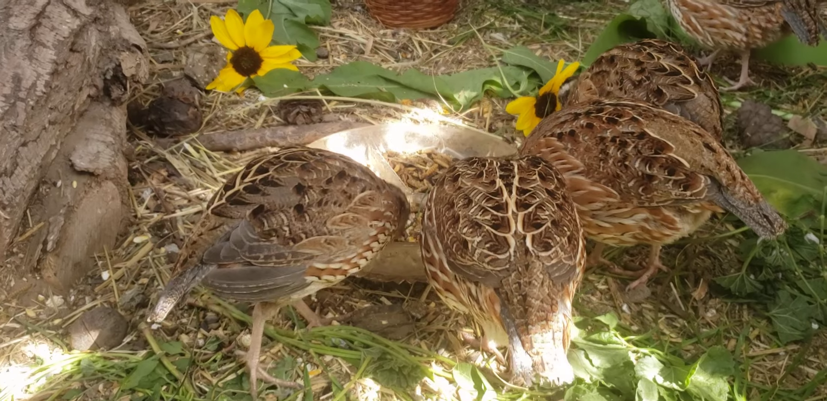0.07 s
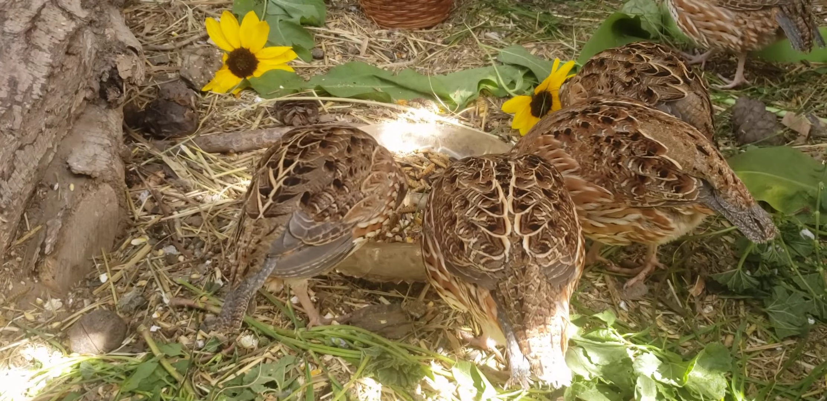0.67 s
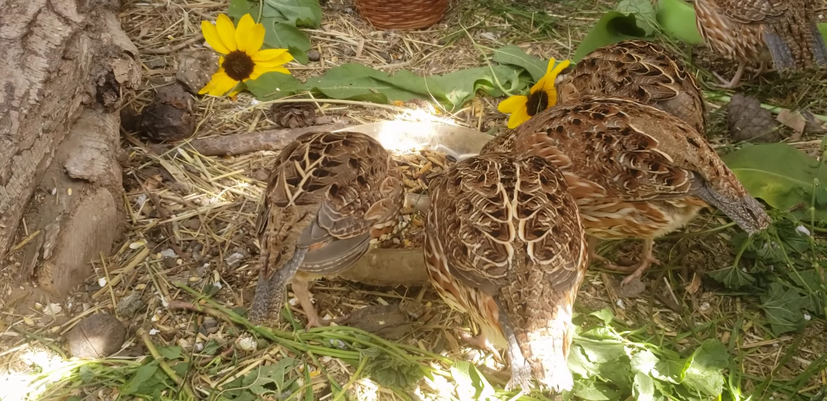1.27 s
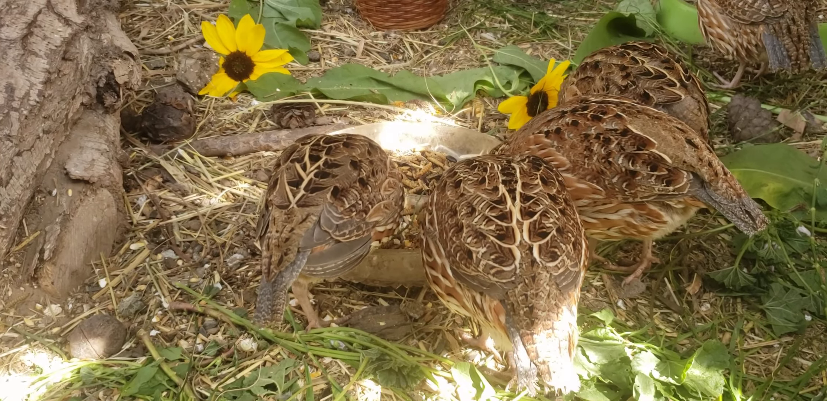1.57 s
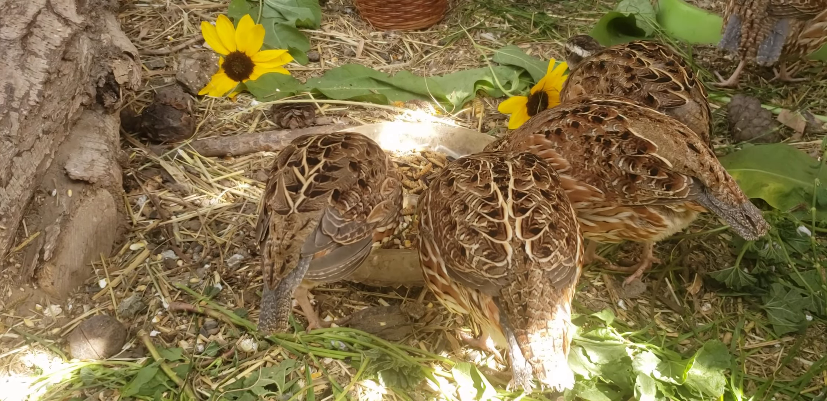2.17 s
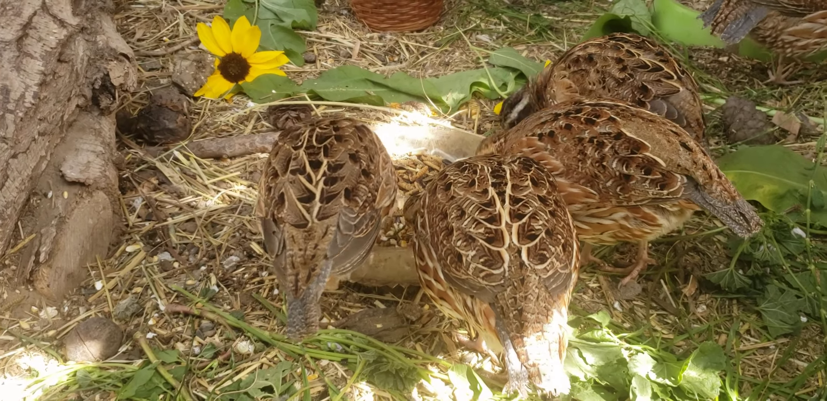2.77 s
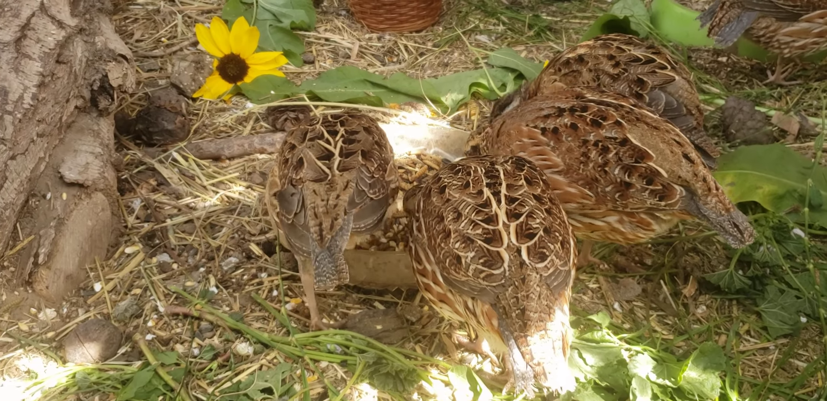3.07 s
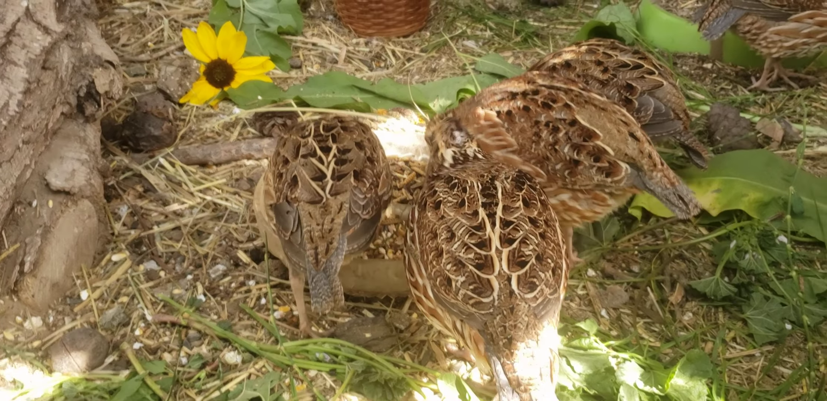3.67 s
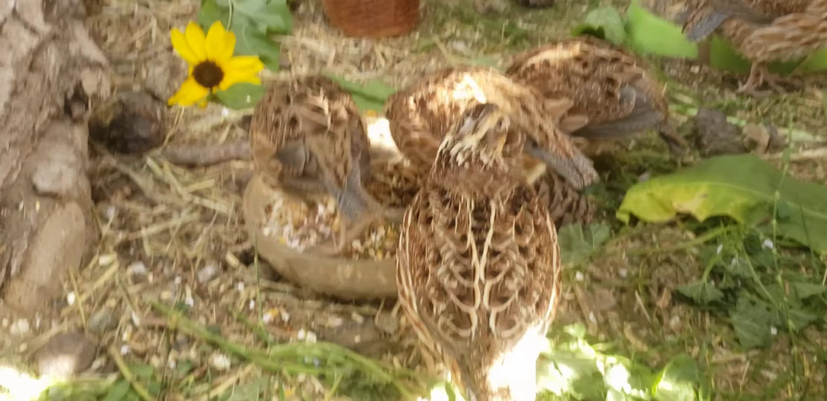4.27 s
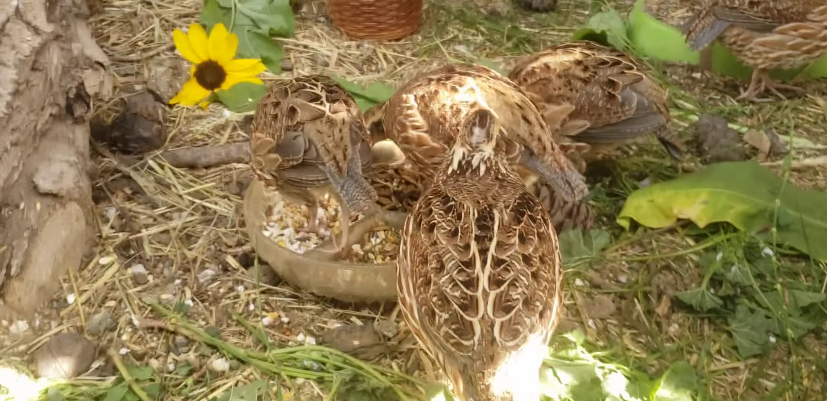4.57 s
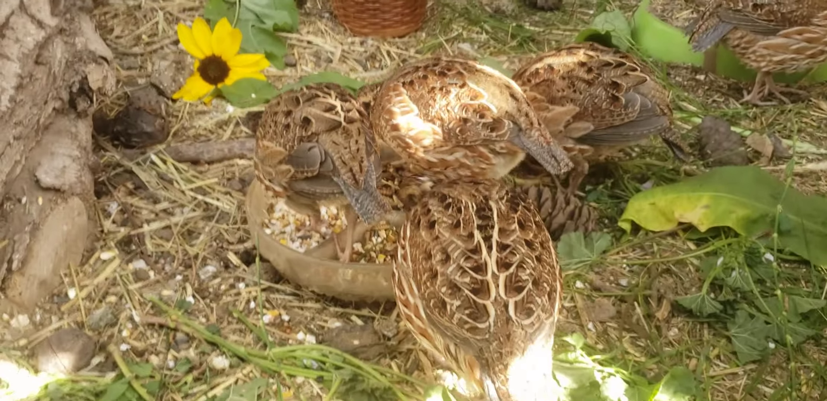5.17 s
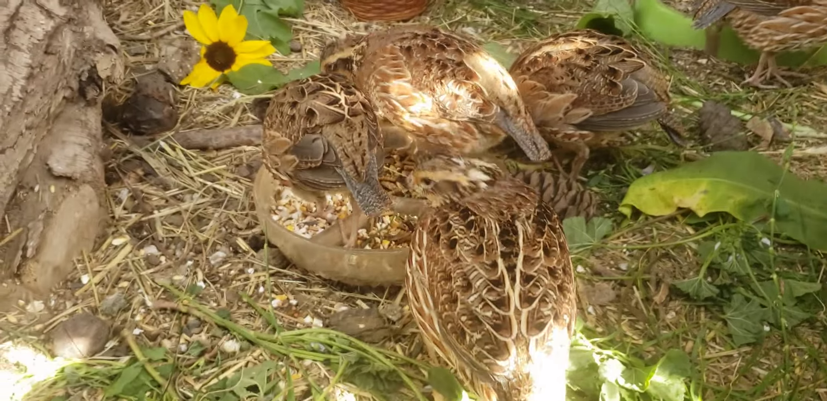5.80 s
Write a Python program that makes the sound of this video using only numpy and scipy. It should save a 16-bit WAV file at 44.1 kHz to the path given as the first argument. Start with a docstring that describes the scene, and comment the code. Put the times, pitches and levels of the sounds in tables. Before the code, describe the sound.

A low outdoor rumble and faint hiss run throughout. At 0.1 seconds fingers rub on a hand-held camera with a hollow click, right at the microphone; lighter ticks follow near 0.6 and 1.1 seconds. Quail a step away, slightly left, give soft, short, hoarse, gliding peeps at about 0.9, 1.2 and 1.7 seconds, then mostly higher ones scattered between 2.3 and 4.1 seconds. From about 2.8 seconds the handling grows busier, with short rubs and scrapes shifting between left and right. The rumble swells from 3.4 to 4 seconds, and two fingertip bumps land on the right near 3.8 and 3.9. A sharp cluster of clicks comes at 4.2 seconds. Rubbing and small clicks continue until about 5.7, with another swell of rumble near 5.5. Three more peeps sound between 5.6 and 6 seconds. Peeps and clicks echo very briefly in the garden.

```python
"""Fingers rub and click on the case of a hand-held camera; close by, quail peep softly at a garden bowl.
The rubbing is stick-slip friction, which drags on the hollow case and hisses over two microphone ports.
Snaps of the case and fingertip bumps are impulses: they excite ticks, hollow rings and thuds.
Each peep of the feeding birds is a hoarse, gliding whistle. Peeps and clicks echo briefly in the garden.
Underneath lie a faint hiss and a low outdoor rumble that swells when the camera rocks in the hand."""
import sys
import numpy as np
from scipy import signal
from scipy.fft import rfft, irfft, next_fast_len
from scipy.io import wavfile
from scipy.ndimage import uniform_filter1d

SR = 44100
rng = np.random.default_rng(int(sys.argv[2]) if len(sys.argv) > 2 else 0)


def wrap_up_sound(samples):
    """Save the sound to the file named by the first command line argument, as 16-bit audio."""
    columns = np.atleast_2d(samples).T
    # keep every value between -1 and 1, then stretch to whole-number steps
    tamed = np.clip(columns, -1, 1)
    steps = np.round(tamed * 32767).astype(np.int16)
    wavfile.write(sys.argv[1], SR, steps)


N = 266143

# All levels in the tables are relative. Balance is left level minus right level.
# Finger strokes on the case:
# (peak time [s], length [s], drag level [dB], balance [dB], scrape level [dB], judder pitch [Hz])
FINGER_STROKES = [(0.094, 0.072, -69, -3.5, -110, 755), (0.104, 0.015, -66, 30, -91, 1730),
                  (0.145, 0.1, -86, 14, -102, 900), (0.262, 0.06, -75.5, 3.5, -104, 1300),
                  (0.389, 0.19, -84, 3.5, -125, 654), (1.159, 0.26, -99, 18, -110, 600),
                  (2.563, 0.1, -84.5, 1, -130, 600), (2.777, 0.079, -78, -1, -130, 740),
                  (2.986, 0.12, -71.5, -2.5, -111, 800), (3.085, 0.083, -75.5, -6, -113, 620),
                  (3.259, 0.092, -77, 2.5, -103, 545), (3.376, 0.077, -72.5, 0.5, -92.5, 1030),
                  (3.523, 0.063, -74.5, 3.5, -92.5, 1200), (3.77, 0.17, -71, -5, -99, 800),
                  (3.823, 0.022, -77.5, -22, -84, 2870), (3.851, 0.012, -70.5, 9, -77, 3130),
                  (3.873, 0.045, -80, -4, -89, 900), (3.966, 0.042, -76.5, -13, -87, 2554),
                  (4.037, 0.066, -63.5, -1.5, -102, 1076), (4.164, 0.15, -83.5, -12, -103, 460),
                  (4.197, 0.012, -82, -9, -89, 3320), (4.253, 0.023, -70, 24, -78.5, 1080),
                  (4.325, 0.057, -73.5, 9, -89.5, 1200), (4.498, 0.22, -83, -9.5, -100, 500),
                  (4.591, 0.073, -74, -4.5, -89.5, 3130), (4.659, 0.058, -75, 13.5, -82.5, 3000),
                  (4.76, 0.032, -74, 8, -84.5, 2500), (4.815, 0.09, -73.5, 15, -84, 900),
                  (4.912, 0.058, -77, 2.5, -94.5, 700), (4.991, 0.035, -82.5, 14.5, -85.5, 1050),
                  (5.047, 0.049, -65.5, 14, -82.5, 620), (5.093, 0.033, -67, 11.5, -101, 523),
                  (5.233, 0.051, -71.5, 11, -100, 766), (5.279, 0.077, -66.5, 8.5, -81, 880),
                  (5.498, 0.026, -77, -8.5, -93, 640), (5.566, 0.095, -70, 7, -92.5, 800),
                  (5.714, 0.071, -82.5, 13.5, -107, 684), (6.011, 0.087, -83.5, 0, -104, 700)]
# Light brushes over a port: (peak time [s], length [s], level [dB], balance [dB])
PORT_BRUSHES = [(0.163, .1, -104, 7), (2.05, .03, -105, -9), (2.2, 0.068, -107, 1), (0.672, 0.035, -101, 3),
                (2.55, 0.12, -115, -31), (2.788, 0.045, -114, -28), (2.921, 0.017, -100, -16),
                (2.993, 0.092, -108, -30.5), (3.107, 0.073, -114, -28), (3.24, 0.12, -107, -20),
                (3.365, 0.094, -111, -31.5), (3.565, 0.17, -106, -29.5), (3.684, 0.3, -107, -27.5),
                (3.964, 0.099, -101, -3), (4.03, 0.062, -103, -27), (4.79, 0.1, -100, 3),
                (5.045, 0.051, -110, -29)]
# Snaps of the case: (time [s], ring level [dB], tick level [dB])
CASE_CLICKS = [(0.0967, 13, -40.5), (0.108, -2.5, -28.5), (0.1104, -3, -34), (0.6474, -3.5, -13.5),
               (0.6603, -18, -42), (0.6756, -22, -31.5), (0.7443, -23, -53), (0.786, -16.5, -51),
               (1.1318, -6.5, -22), (1.4378, -10, -42.5), (2.0666, -28, -49), (2.9424, -2, -62),
               (3.332, -14, -38), (3.3994, -17, -30), (3.82, -5, -39.5), (3.851, -23, -29),
               (4.145, -27.5, -35), (4.208, 8, -7.5), (4.2121, 4, -10.5), (4.2145, 5.5, -26),
               (4.541, -3, -41), (4.7515, -10, -34), (4.9752, -6, -49), (5.0386, -1, -27), (5.22, 2, -55.5),
               (5.494, -5.5, -42.5), (5.539, -9, -52)]
# Fingertip bumps beside the right port: (time [s], push level [dB], push cutoff [Hz], crack level [dB],
# thud level [dB], thud pitch [Hz], thud 60 dB decay time [s])
FINGER_BUMPS = [(3.7690, 18, 1076, -18.5, -63, 110, 0.094), (3.9393, 18, 1100, 8, -25, 160, 0.056),
                (4.4259, 8, 816, -13, -3, 73.4, 0.0062)]
# Quail calls: (time [s], length [s], top pitch [Hz], place of the top [0-1], level [dB])
QUAIL_PEEPS = [(0.945, 0.072, 1365, 0.5, -67.5), (1.19, 0.069, 1050, 1, -73),
               (1.253, 0.13, 1800, 0.02, -75), (1.71, 0.067, 1320, .55, -68),
               (2.272, 0.049, 2300, 0.5, -75), (2.553, 0.071, 1480, 1, -71), (2.902, 0.03, 2800, 0.3, -78),
               (3.039, 0.1, 2172, 1, -65), (3.531, 0.037, 2130, 0.4, -67.5), (3.9, .053, 2617, 0.9, -70),
               (4.053, 0.097, 2120, 0.92, -73), (5.625, 0.0545, 2150, 0.74, -71),
               (5.688, 0.05, 1920, .65, -70.5), (6.003, 0.061, 2150, 1, -70.5)]
# Shifts of the grip that rock the camera: (peak time [s], length [s], level [dB], balance [dB])
GRIP_SHIFTS = [(0.123, 0.027, -49, 20), (3.396, 0.026, -41.5, -16), (3.557, .05, -47.5, -10),
               (3.712, 0.12, -44.5, -5), (3.841, 0.14, -46, -6.5), (3.95, 0.095, -44.5, -12.5),
               (4.316, 0.16, -53, -9), (5.164, 0.19, -54, -15.5), (5.524, 0.095, -47, 2),
               (5.74, 0.057, -48, 3)]

# Spectra at the two ports: (frequency [Hz], left level [dB], right level [dB])
DRAG_SPECTRUM = [(60, -12, -1.5), (155, -9, 4), (299, -15.5, -1), (550, 0, -16), (800, -7.5, -11),
                 (1200, -21.5, -17), (1800, -33.5, -36), (3000, -36, -32.5), (6000, -48.5, -66.5),
                 (12000, -85, -75)]  # skin dragging on the hollow case
SCRAPE_SPECTRUM = [(201.3, -22, -19), (500, -7.5, 3), (1200, 4, 6), (2300, 0.5, -11), (3300, -7, -4),
                   (4550, -16.5, -5.5), (6020, -23, -16), (8150, -40, -36), (10000, -42.5, -16),
                   (11500, -30, -12.5), (15500, -35.5, -21.5)]  # skin scraping over the ports
PORT_SPECTRUM = [(6000, -54, -57), (8200, -22, -29), (9470, 1, -8.5), (10500, -10, -2.5), (12000, -5, -6),
                 (15500, -15, -12)]  # hiss of a port's narrow channel
RING_SPECTRUM = [(58.2, -22, -5.5), (202, -11.5, -36.5), (432, -1, -15), (600, 3.5, -29), (900, -8, -16.5),
                 (1200, -5, -12.5), (1800, -15, -25), (3000, -19, -39.5), (8200, -48, -68.5)]  # hollow ring of the case
TICK_SPECTRUM = [(100, -26, -8), (600, -16, -12.5), (1300, -15, 8.5), (2000, -3.5, 3.5), (2700, -13.5, 2.5),
                 (3600, -6.5, 2.5), (5000, -13.5, -2.5), (6400, -44, -15.5), (8400, -37, -26),
                 (10050, -31.5, -3), (11160, -21, 0.5), (13610, -36.5, -17)]  # sharp tick of the case
AIR_SPECTRUM = [(20, -97, -101.5), (38, -79, -79), (57.2, -63, -69.5), (78, -77, -67), (110, -71, -75.5),
                (157.4, -86.5, -82), (290, -102, -93.5), (500, -108, -109), (1500, -113, -116),
                (2150, -110, -118), (3000, -117, -120), (8000, -130, -132), (12400, -120, -119),
                (15500, -120, -122)]  # outdoor rumble and hiss


def rubbing(tremble_db=2.0):
    """Sliding friction: each stroke drags on the case and scrapes the ports under a trembling grip."""
    time, length, drag_db, pan_db, scrape_db, _ = np.transpose(FINGER_STROKES)
    grip = amp(tremble_db * wander(per_s=43))
    drag = panned_swells(time, length, drag_db, pan_db) * grip
    drag *= stick_slip(slips_per_s=500, spread_db=-0.5, smooth=0.39, likeness=0.13)
    scrape = swells(time, length, scrape_db) * grip
    scrape = scrape * stick_slip(slips_per_s=760, spread_db=-1, smooth=0.59, likeness=0.15)
    return amp(-4.5) * tinted(drag, DRAG_SPECTRUM) + amp(-3.5) * tinted(scrape, SCRAPE_SPECTRUM)


def stick_slip(slips_per_s, spread_db, smooth, likeness):
    """Stick-slip friction: tiny uneven jerks over a hiss that carries the share `smooth` of the power."""
    slips = amp(spread_db * np.minimum(rng.exponential(1, N), 4))
    slips *= rng.random(N) < slips_per_s / SR
    grain = np.sqrt(smooth + (1 - smooth) * slips ** 2 / np.mean(slips ** 2))
    return grain * pair(*rng.standard_normal((2, N)), likeness)


def juddering(relative_width=0.61, length_share=0.23, db_per_octave=4.5, pan_db_per_octave=-4.5):
    """Frictional oscillation: skin catches at each stroke's peak and its slips crowd around one pitch."""
    out = np.zeros((2, N))
    for time, length, drag_db, pan_db, _, hz in FINGER_STROKES:
        width_hz = relative_width * hz
        judder = pair(noise_band(hz, width_hz), noise_band(hz, width_hz), likeness=0.99)
        t = (np.arange(judder.shape[1]) - judder.shape[1] // 2) / SR
        octaves = np.log2(hz / 900)  # higher judders are louder and lie further right
        gain = amp(drag_db + 10 + db_per_octave * octaves)
        swell = np.exp(-(t / (length_share * length)) ** 2 / 2)
        place = sides(0.7 * pan_db + pan_db_per_octave * octaves)
        add(out, max(time + t[0], 0), (place * gain * swell * judder)[:, time + t >= 0])
    return out


def brushing():
    """Channel resonance: skin passing lightly over a port makes its narrow channel hiss."""
    touch = panned_swells(*np.transpose(PORT_BRUSHES))
    friction = stick_slip(slips_per_s=4400, spread_db=13.5, smooth=0.68, likeness=0)
    return amp(-1.5) * tinted(touch * friction, PORT_SPECTRUM)


def clicking(ping_hz=3950, ping_t60=0.0052, left_lag_s=0.00019):
    """Impulse response: a snap of the case excites a rebounding tick, a brief ping and a hollow ring."""
    out = np.zeros((2, N))
    ring, tick = impulse_response(RING_SPECTRUM), impulse_response(TICK_SPECTRUM)
    t = np.arange(tick.shape[1]) / SR
    ping = amp(-22 - 60 * t / ping_t60) * np.cos(2 * np.pi * ping_hz * t)
    rebound = amp(-11) * delayed(tick, seconds=0.00034)
    snap = tick + rebound + ping
    for time, ring_db, tick_db in CASE_CLICKS:
        cutoff_hz = np.clip(7000 * 2 ** ((tick_db - ring_db) / 17), 700, SR / 4)  # soft contact, dull ring
        body = butterworth(ring, 2, cutoff_hz, "low")
        add(out, time, amp(ring_db) * body + amp(tick_db) * snap)
    return np.array([-delayed(out[0], left_lag_s), out[1]])  # the left port is pulled the other way


def bumping(crack_delay_s=0.00041, left_lag_s=0.0005):
    """Impact: a fingertip gives a soft push, a rebounding crack and a damped thud as the camera rocks."""
    out = np.zeros((2, N))
    tick = impulse_response(TICK_SPECTRUM)
    rebound = amp(-8) * delayed(tick, seconds=0.000318)
    crack = amp([[-8], [-1]]) * (tick + rebound)  # left, right
    t = np.arange(SR // 5) / SR
    for time, push_db, cutoff_hz, crack_db, thud_db, thud_hz, thud_t60 in FINGER_BUMPS:
        pulse = butterworth(t == 0, 6, cutoff_hz, "low")
        push = amp(push_db) * butterworth(pulse, 2, 110, "high")
        thud = amp(thud_db - 60 * t / thud_t60) * np.sin(2 * np.pi * thud_hz * t)
        add(out, time, amp([[-18], [0]]) * (push - thud))
        add(out, time + crack_delay_s, amp(crack_db) * crack)
    return np.array([delayed(out[0], left_lag_s), out[1]])


def quail_peeping(sweep_hz_per_s=7000, fall_steepening=2.1, waver=0.045):
    """Modulation: each whistle follows one arch of pitch; random amplitude and phase make it hoarse."""
    out = np.zeros((2, N))
    jitter = 1 + waver * wander(per_s=250)
    hoarseness = 0.65 + 0.5 * (wander(per_s=190) + 1j * wander(per_s=190))
    for time, length, top_hz, crest, db in QUAIL_PEEPS:
        progress = np.linspace(0, 1, round(length * SR))
        span = (round(time * SR) + np.arange(len(progress))) % N
        arch = ((progress - crest) / max(crest, 1 - crest)) ** 2
        arch *= np.where(progress > crest, fall_steepening, 1)
        hz = (top_hz - sweep_hz_per_s * length * arch) * jitter[span]  # longer peeps sweep further
        whistle = (hoarseness[span] * np.exp(2j * np.pi * np.cumsum(hz) / SR)).real
        swell = amp(db) * signal.windows.tukey(len(progress), 0.5)
        add(out, time, sides(pan_db=5.5) * swell * whistle)
    return out


def garden_echoes(sound, t60, echoes_per_s=2000, first_echo_s=0.004):
    """Reflection: the ground, a trunk and nearby walls return sparse, quickly fading echoes."""
    t = np.arange(SR // 2) / SR
    taps = rng.standard_normal((2, len(t))) * (rng.random((2, len(t))) < echoes_per_s / SR)
    taps *= (t > first_echo_s) * amp(-60 * t / t60)
    taps /= np.linalg.norm(taps, axis=1, keepdims=True)
    return signal.fftconvolve(sound, taps, axes=1)[:, :N]


def outdoor_air(split_hz=150):
    """Power addition: a low rumble grows as the camera rocks, beneath a steady faint hiss."""
    noise = rng.standard_normal((2, N))
    lowpass = lambda hz: 1 / (1 + (hz / split_hz) ** 6)
    rumble = filtered(tinted(pair(*noise, likeness=0.5), AIR_SPECTRUM), lowpass)
    hiss = filtered(tinted(pair(*noise, likeness=0.05), AIR_SPECTRUM), lambda hz: 1 - lowpass(hz))
    rumble /= np.sqrt(uniform_filter1d((rumble ** 2).mean(0), SR // 4))  # unit power per quarter second
    rocking = panned_swells(*np.transpose(GRIP_SHIFTS))
    ambient = amp(-54.5 - 1.55 * wander(per_s=4))
    return np.hypot(ambient, rocking) * rumble + amp(0.32) * hiss


def swells(time, length, db, rise_share=0.45):
    """Envelope of strokes that each swell and die away, summed in power."""
    grid = np.arange(0, N, 32)
    from_peak = grid / SR - time[:, None]
    width = length[:, None] * np.where(from_peak < 0, rise_share, 1 - rise_share)
    shape = np.exp(-abs(from_peak / width) ** 1.5)
    return np.interp(np.arange(N), grid, np.sqrt(amp(db) ** 2 @ shape ** 2))


def panned_swells(time, length, db, pan_db):
    """Left and right stroke envelopes with a level difference."""
    return np.array([swells(time, length, db + side * pan_db) for side in (0.5, -0.5)])


def wander(per_s):
    """Low-pass noise: a smooth random curve of unit variance."""
    curve = filtered(rng.standard_normal(N), lambda hz: np.exp(-(hz / per_s) ** 2))
    return curve / curve.std()


def noise_band(centre_hz, width_hz, size=16384):
    """Band-pass noise of unit variance."""
    hz = np.fft.rfftfreq(size, 1 / SR)
    band = irfft(rfft(rng.standard_normal(size)) / (1 + (2 * (hz - centre_hz) / width_hz) ** 4))
    return band / band.std()


def pair(a, b, likeness):
    """Partial coherence: two independent noises become channels with correlation `likeness`."""
    return np.array([a, likeness * a + np.sqrt(1 - likeness ** 2) * b])


def spectral_gains(spectrum, hz):
    """Left and right gains of a spectrum, interpolated in log frequency."""
    knots_hz, *levels = np.transpose(spectrum)
    return amp([np.interp(np.log(hz + 1), np.log(knots_hz + 1), db) for db in levels])


def tinted(white, spectrum):
    """Spectral shaping: unit white noise takes the spectrum as its density in dB per Hz."""
    return filtered(white, lambda hz: spectral_gains(spectrum, hz)) * np.sqrt(SR / 2)


def impulse_response(spectrum, size=4096):
    """Minimum phase: the shortest click that has a given spectrum."""
    log_gain = np.log(spectral_gains(spectrum, abs(np.fft.fftfreq(size, 1 / SR))))
    response = np.exp(np.conj(signal.hilbert(log_gain)))
    return np.fft.ifft(response).real[:, :size // 2]


def filtered(x, gain):
    """Linear filtering by a gain that depends on frequency."""
    size = next_fast_len(x.shape[-1], True)
    return irfft(rfft(x, size) * gain(np.fft.rfftfreq(size, 1 / SR)), size)[..., :x.shape[-1]]


def butterworth(x, order, cutoff_hz, kind):
    """Maximally flat low-pass or high-pass filtering."""
    return signal.sosfilt(signal.butter(order, cutoff_hz, kind, fs=SR, output="sos"), x)


def delayed(x, seconds):
    """Delay as a linear phase shift."""
    return filtered(x, lambda hz: np.exp(-2j * np.pi * hz * seconds))


def amp(db):
    """Decibels to amplitude gain."""
    return 10 ** (np.asarray(db) / 20)


def sides(pan_db):
    """Left and right gains for a level difference."""
    return amp(np.array([[0.5], [-0.5]]) * pan_db)


def add(mix, time, sound):
    """Superposes a two-channel sound on the mix at a time in seconds."""
    part = mix[:, max(round(time * SR), 0):][:, :sound.shape[1]]
    part += sound[:, :part.shape[1]]


def scene():
    """Superposition: handling sounds at the ports, quail a step away, their echoes and the air."""
    clicks, quail = clicking(), quail_peeping()
    echoes = amp(-17) * garden_echoes(clicks, t60=0.096) + amp(-1) * garden_echoes(quail, t60=0.13)
    handling = rubbing() + juddering() + brushing() + clicks + bumping()
    return handling + quail + echoes + outdoor_air()


def record(dry, bass_edge_hz=14, treble_edge_hz=16100):
    """Band limiting: the camera drops the deepest bass and the highest treble."""
    highpassed = butterworth(dry, 2, bass_edge_hz, "high")
    lowpass = signal.firwin(255, treble_edge_hz, window=("kaiser", 9), fs=SR)
    return signal.oaconvolve(highpassed, lowpass[None], "same", axes=1)


dry = scene()
out = record(dry)
wrap_up_sound(out)
```